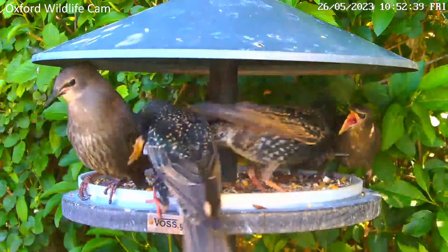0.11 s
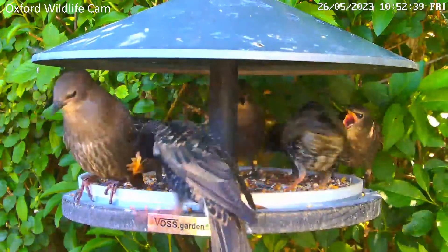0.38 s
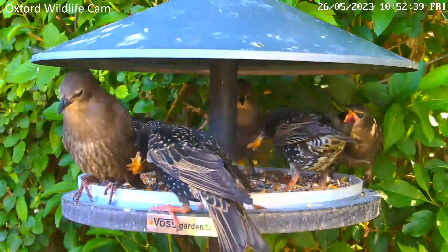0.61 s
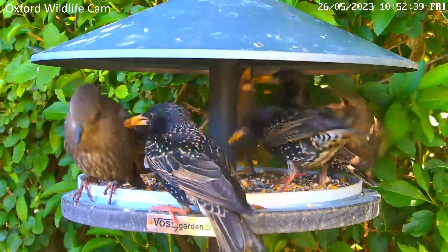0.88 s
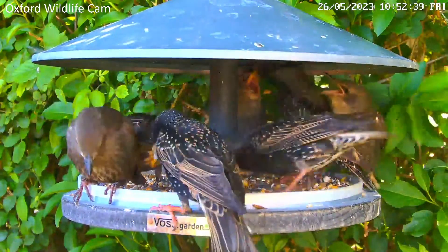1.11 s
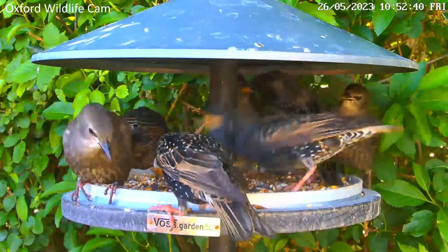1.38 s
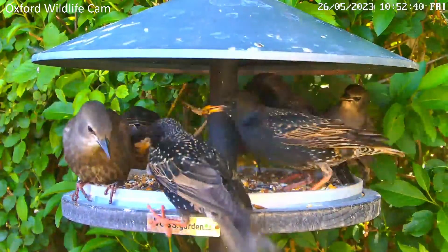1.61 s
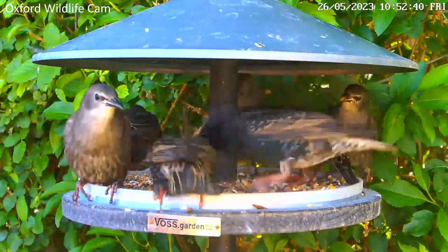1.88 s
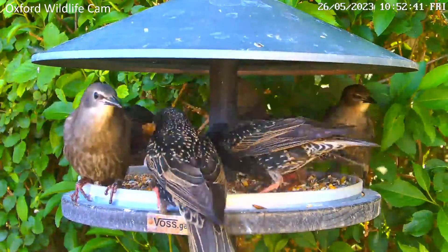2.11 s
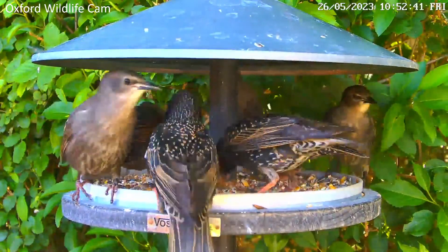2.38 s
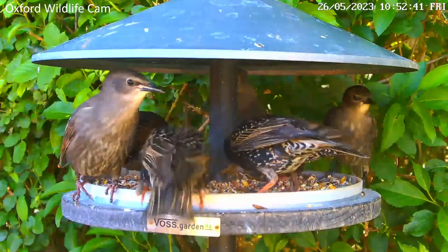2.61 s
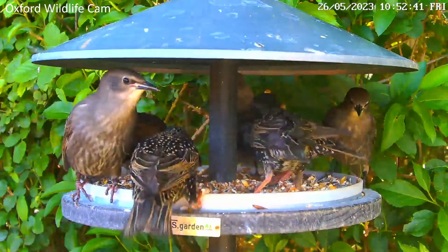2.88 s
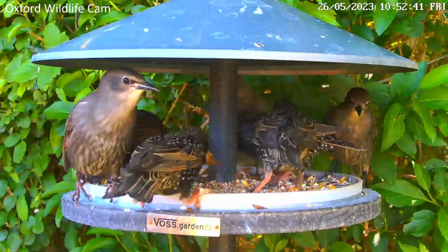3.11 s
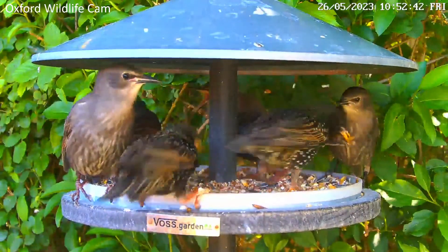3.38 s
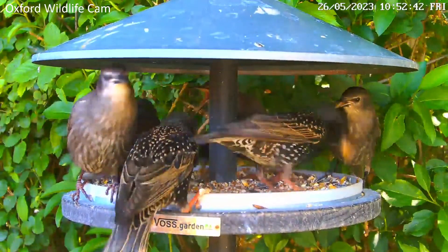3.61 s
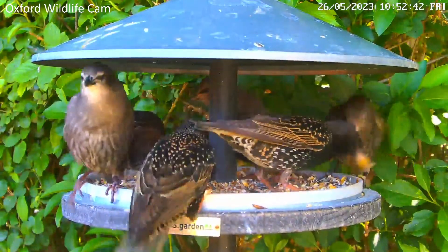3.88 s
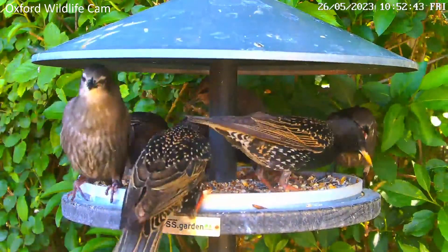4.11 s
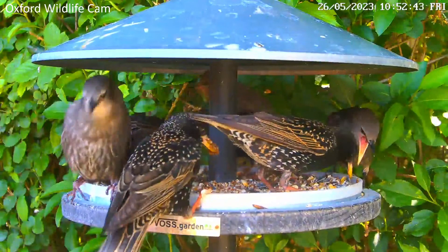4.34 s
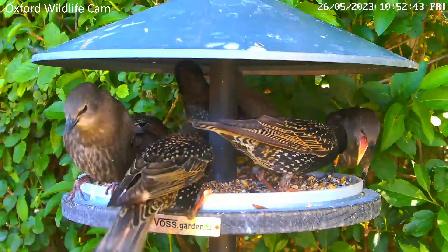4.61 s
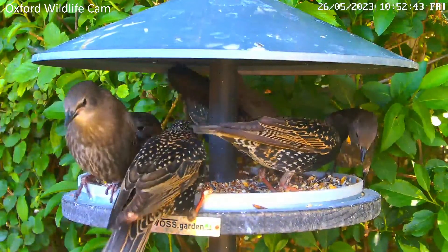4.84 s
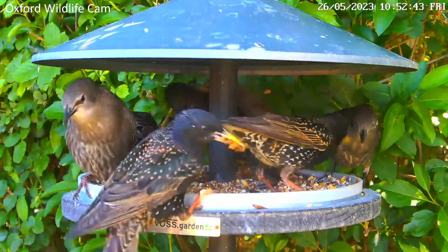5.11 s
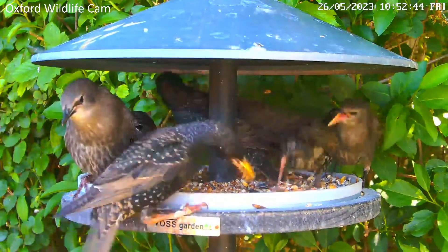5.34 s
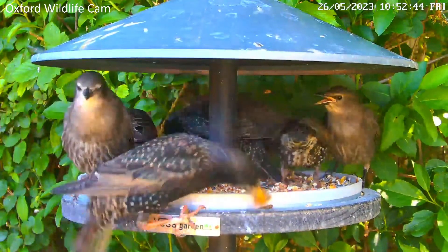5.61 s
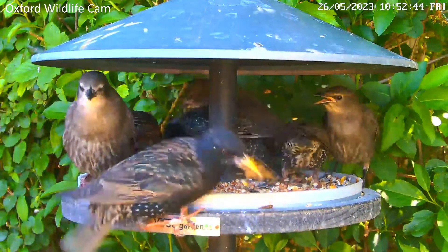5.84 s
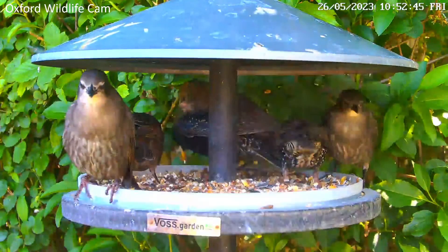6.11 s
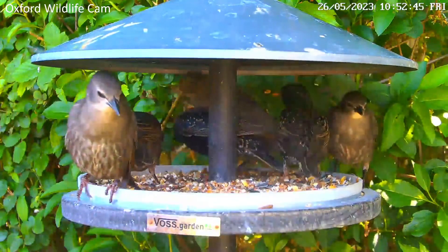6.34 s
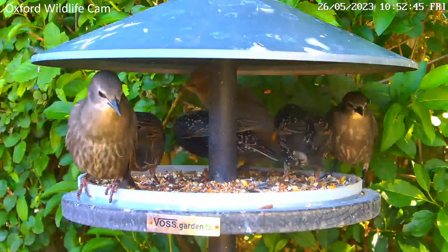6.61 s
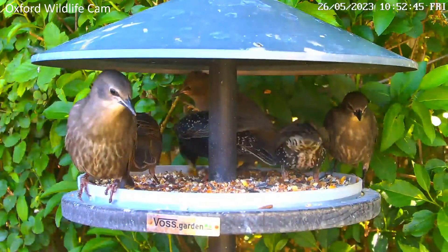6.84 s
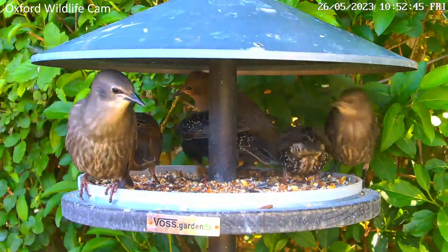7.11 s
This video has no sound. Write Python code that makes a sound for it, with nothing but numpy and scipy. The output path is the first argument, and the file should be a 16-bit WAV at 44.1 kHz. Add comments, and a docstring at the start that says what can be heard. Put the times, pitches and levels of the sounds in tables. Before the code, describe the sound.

Young starlings beg at a garden feeder, close to a small camera microphone. A raspy call opens, then from 0.2 to 0.65 s wing beats hit the microphone as deep, soft thumps with tray knocks, a sharp beak click at 0.53 and a buzzy warbling trill at 0.5. A loud harsh screech comes at 1.1, two strong hissing ones at 1.8-2.1, with thin sliding peeps around them. From 2.6 to 3.6 medium rasps mix with light taps. At 4.0 a bright call leads to the loudest trill, 4.3-4.5, with a hard knock at 4.4, then another rasp. Calls thin out around 5, return from 5.25 and peak sharply at 5.75. After a lull, a short trill and knock at 6.35 precede a strong screech at 6.6. Falling peeps, low flutters and growing faint hum close from 6.9 to 7.1. Treble dulls briefly at 4.05 and 6.3.

```python
"""Young starlings crowd a garden feeder and beg: rough voices and breath through moving throat and beak bands.
Three warbling trills and thin sliding peeps are tones with swung or shaken pitch.
Wing beats buffet the small camera microphone: low noise and pull-push pulses.
Knocks ring the tray, beak clicks are noise ticks, and a metal roof adds short echoes.
Mains harmonics swell and fade over garden noise; the treble drops out twice, briefly."""
import sys
import numpy as np
from scipy import signal
from scipy.fft import rfft, irfft, next_fast_len
from scipy.io import wavfile
from scipy.ndimage import uniform_filter1d

SR = 44100
rng = np.random.default_rng(int(sys.argv[2]) if len(sys.argv) > 2 else 0)


def convert_level_to_amplitude(level_db):
    """Map a level in decibels to its linear amplitude factor."""
    exponent = np.asarray(level_db, float) / 20
    return 10 ** exponent


def digitize_waveform(pressure):
    """Quantize a signal to 16-bit integers and store it at the path in sys.argv[1].

    Rows of a 2-D input are taken as channels; values are limited to [-1, 1].
    """
    field = np.atleast_2d(pressure).T
    bounded = np.clip(field, -1, 1)
    quanta = np.round(bounded * 32767).astype(np.int16)
    wavfile.write(sys.argv[1], SR, quanta)


N = 318402

# begging calls: start_s, crest_after_s, length_s, beak_db, beak_open_hz, throat_db, throat_hz, hiss_db
BEG_CALLS = [(-.08, 0.18, 0.31, -20.5, 4170, -38, 3042, -36.5),
             (0.206, 0.067, 0.26, -36, 3650, -32, 3170, -46.5),
             (0.481, 0.057, .13, -24, 4000, -33, 2736, -34.5), (.63, .16, .26, -36, 4310, -45, 2504, -45.5),
             (.87, .12, .24, -36.5, 4233, -40.5, 2879, -44),
             (1.08, .115, .285, -13, 4920, -19.5, 2814, -21),
             (1.398, 0.086, 0.17, -37, 4312, -65, 3256, -65), (1.6, .22, .26, -23, 4120, -50, 2532, -32),
             (1.822, .095, .2, -11, 4850, -27, 2396, -17.5), (1.95, .105, .19, -12.5, 4050, -29, 2400, -22),
             (2.1, .06, 0.25, -26.5, 3925, -26.5, 2938, -31.5),
             (2.608, .05, .1, -33.5, 4597, -48, 2690, -35), (2.671, .11, 0.23, -23, 4190, -22, 3033, -34),
             (2.85, .1, .34, -23.5, 4065, -29.5, 3000, -31), (3.18, .06, .13, -44, 3860, -35, 2828, -54),
             (3.276, 0.064, 0.12, -30, 4095, -34, 3042, -40.5),
             (3.385, .09, 0.16, -22.5, 4100, -29.5, 3020, -32),
             (3.52, .06, 0.16, -39.5, 3796, -33.5, 2898, -47),
             (4.043, 0.054, 0.25, -19.5, 5095, -38.5, 2450, -29.5),
             (4.266, 0.15, 0.25, -21.5, 4900, -30.5, 2600, -20),
             (4.575, .08, .21, -17, 4040, -25, 2969, -26), (4.77, .12, .275, -41, 3600, -31, 2637, -57),
             (5.251, 0.054, .125, -24, 3890, -32, 3165, -32.5),
             (5.318, 0.088, 0.16, -22.5, 5050, -28, 3016, -37.5),
             (5.46, .18, 0.31, -20.5, 4083, -27.5, 2847, -31),
             (5.728, 0.059, .11, -14.5, 4800, -31, 2714, -31), (5.8, .05, .13, -46, 4500, -36, 2700, -55),
             (5.898, 0.069, 0.26, -39, 4225, -46, 2831, -47), (6.14, .11, .16, -38, 4300, -64, 3207, -51.5),
             (6.309, 0.071, 0.13, -21.5, 4030, -35, 2756, -15.5),
             (6.41, 0.062, .17, -25, 4250, -28, 3010, -37),
             (6.56, 0.068, .17, -11.5, 4648, -23, 2879, -18.5), (6.69, .07, .26, -29, 4000, -25, 3150, -34),
             (6.9, 0.091, 0.3, -34, 4640, -40, 2940, -41),
             (7.12, 0.074, 0.12, -20.5, 3870, -28.5, 2915, -35.5)]
# upper rasp spectrum: freq_hz, level_db
HISS_SPECTRUM = [(4300, -35), (5200, 7.5), (5700, 0.5), (6500, 2), (7500, -1), (8200, -14), (8900, -28.5)]
# dull air under a call, spectrum: freq_hz, level_db
SKIRT_SPECTRUM = [(300, -25.5), (700, -11.5), (1100, -1), (1500, 16.5), (2000, -7.5), (3000, -49.5)]
# trills: start_s, end_s, first_tall_crest_s, warble_hz, pitch_hz,
# swing_once_hz, swing_twice_hz, swing_thrice_hz (per warble), first_swing_lag_turns, fade_s
TRILL_CALLS = [(.497, .63, .5200, 40.9, 2340, 330, 600, 0, .21, .04),
               (4.284, 4.545, 4.2906, 47.3, 2330, 400, 370, 150, .06, .09),
               (6.319, 6.438, 6.3412, 40.3, 2340, 340, 620, 0, .21, .01)]
# per trill: tone_db, overtones_re_tone_db
TRILL_LEVELS = [(-17, -4.5), (-6.5, -16.5), (-7.5, -2.5)]
# vocal tract of a trilling bird: freq_hz, gain_db
TRILL_TRACT_GAIN = [(1200, -21), (1800, -9), (2400, -3), (3100, -1.5), (3500, -5), (4000, -1), (4600, -9.5),
                    (6000, -9.5), (8500, -30)]
# thin cries from single birds: start_s, end_s, from_hz, to_hz, level_db
PEEP_CALLS = [(0.117, 0.336, 4284, 3400, -33), (0.721, 0.878, 4374, 4210, -41),
              (0.746, 0.968, 2027, 1997, -43.5), (.96, 1.09, 5300, 6000, -46),
              (1.184, 1.391, 4490, 3650, -25), (1.465, 1.493, 3300, 4300, -34),
              (1.626, 2.061, 4156, 3950, -29.5), (1.849, 2.134, 2170, 1706, -31.5),
              (3.406, 3.62, 4300, 3300, -33), (3.6, 3.76, 2900, 2300, -43),
              (4.052, 4.275, 4200, 4000, -32.5), (4.279, 4.286, 3100, 3000, -15.5),
              (4.668, 4.794, 3740, 2930, -27), (4.866, 4.898, 3620, 4260, -36.5),
              (4.936, 5.08, 2750, 2334, -29), (5.27, 5.304, 5640, 5520, -36),
              (5.444, 5.561, 6880, 6840, -37), (5.447, 5.697, 4330, 3850, -28),
              (5.62, 5.76, 3400, 2600, -33), (5.93, 6.14, 6970, 6930, -51), (5.934, 6.158, 4350, 4050, -42),
              (6.644, 6.771, 4400, 3047, -22.5), (6.837, 7.147, 4970, 4150, -34.5)]
# wing beats that hit the microphone: start_s, level_db, beat_hz
WING_BEATS = [(0.217, -26.5, 72.5), (0.259, -23, 75), (0.313, -16, 70), (0.387, -10.5, 60.4),
              (0.453, -6.5, 49.6), (0.521, -15.5, 45.4), (0.572, -12, 27), (0.64, -21, 40),
              (0.789, -29, 43.6), (6.942, -27, 40), (7.024, -18, 42), (7.111, -17.5, 42)]
# gusts on the microphone: crest_s, level_db, half_width_s
AIR_GUSTS = [(.47, -24.5, .14), (.8, -40, .03), (2.2, -41, .17), (2.75, -52, 0.28), (7.07, -32, .1)]
# buffeting spectrum: freq_hz, level_db
BUFFET_SPECTRUM = [(8, -38), (14, -5), (25, -1), (45, -8), (75, -8), (120, -22), (200, -32), (300, -38),
                   (700, -41), (1000, -60)]
# knocks on the tray: start_s, peak_db
TRAY_KNOCKS = [(0.189, -30), (0.203, -35.5), (0.335, -26), (0.414, -27), (0.46, -31.5), (0.495, -19),
               (0.514, -18.5), (0.533, -16.5), (2.655, -33.5), (3.207, -29), (3.286, -31), (3.344, -31),
               (3.974, -47.5), (4.27, -28.5), (4.394, -15), (4.418, -29.5), (5.927, -35), (6.241, -35),
               (6.355, -19)]
# tray modes: freq_hz, level_db, t60_s
TRAY_MODES = [(330, -1, 0.024), (513, 0, .02), (680, -1, .02), (936, 0, .03), (1100, -1, .025),
              (1360, -1, 0.042), (2600, -13, .01)]
# beak clicks: start_s, level_db
BEAK_CLICKS = [(0.5344, -5), (2.5408, -44), (2.6564, -26.5), (3.412, -24.5), (3.792, -36), (3.8188, -42.5),
               (3.977, -43.5), (5.163, -33.5), (5.24, -38.5)]
# mains hum course: time_s, level_db
HUM_COURSE = [(0.9, -63), (1.3, -48), (1.41, -55), (2.99, -47), (3.05, -53), (3.56, -47), (5.12, -43.5),
              (5.3, -56), (5.51, -51), (6.06, -51), (6.27, -41), (6.62, -41), (7.11, -34), (7.22, -40)]
# mains harmonics: freq_hz, level_db
HUM_HARMONICS = [(100, -16), (150, 0.5), (200, -17), (250, -20), (300, -18.5), (450, -23.5)]
# garden noise spectrum: freq_hz, level_db
GARDEN_SPECTRUM = [(30, -11.5), (60, -5), (130, -5.5), (220, -9), (350, -15.5), (900, -15), (1500, -17.5),
                   (2500, -19.5), (4000, -21), (6000, -27.5), (8000, -40.5), (9000, -62)]
# camera housing: freq_hz, gain_db
HOUSING_GAIN = [(5, -5), (1600, -2.5), (2000, -1), (2400, -1), (3050, 0.5), (3500, 0.5), (4050, 2),
                (4500, -0.5), (20000, -3)]
# treble dropouts: from_s, to_s
TREBLE_LOSSES = [(4.022, 4.076), (6.259, 6.38)]

# call band timing: late_s, fade_from_crest_to_end_db, shut_s; the throat follows and outlasts the beak
BEAK, THROAT, AIR = (0, -10, .05), (.015, -4.5, .07), (.0069, -13, .063)
ONSET_S, SOFT_S_PER_DB, LOUD_DB = .04, .002, -20  # calls below LOUD_DB set in more slowly
CLOSED_DB, SWELL_DB_PER_S = -23.5, 55  # depth of onset and shutting; climb from onset to crest
BEAK_REST_HZ, BEAK_CLOSING_S = 3700, .14  # the beak band slides back after the crest
THROAT_SAG = .1  # share of throat_hz lost from crest to end
FAR_BEAK_DB, FAR_BEAK_HZ = -61.5, 4400  # birds further off, always there
FAR_THROAT_DB, FAR_THROAT_HZ, FAR_HISS_DB = -58, 2600, -59
THROAT_WIDTH_HZ, BEAK_WIDTH_HZ = 1676, 1630
SQUEAL_WOBBLE_HZ, CROAK_WOBBLE_HZ = 150, 170
SKIRT_DB = -28.5  # re throat
CREST_DB = 2.5  # a trill is louder on its tall crest
PEEP_WOBBLE = .026  # share of the starting pitch
CALM_DB = -50  # moving air between gusts
SNAP, PULL_TURNS, PUSH_TURNS = 55, .24, .36  # harder beats flip faster; widths of the two halves
ROOF_DB, ROOF_T60_S = -12, .06
GARDEN_DB = -52.5
LIMIT = .69  # the microphone amplifier saturates here
DULL_HZ, EDGE_HZ = 4550, 8680  # low-pass cutoffs: in a treble dropout, otherwise


def evened(x):
    """Scale to rms 1."""
    return x / np.sqrt(np.mean(x ** 2) + 1e-20)


def played(rows):
    """Columns of a timed curve, interpolated at every sample."""
    time_s, *columns = np.transpose(rows)
    return [np.interp(np.arange(N) / SR, time_s, column) for column in columns]


def coloured(x, points):
    """Filter by a spectrum of (Hz, dB), interpolated over log frequency."""
    size = next_fast_len(len(x))
    hz, db = np.transpose(points)
    bins = np.log(np.fft.rfftfreq(size, 1 / SR) + 1)
    gain_db = np.interp(bins, np.log(hz + 1), db, left=-90, right=-90)
    return irfft(rfft(x, size) * convert_level_to_amplitude(gain_db), size)[:len(x)]


def drift(hz):
    """Random motion of rms 1: white noise low-passed at hz."""
    lowpass = signal.butter(2, hz, fs=SR, output="sos")
    return evened(signal.sosfilt(lowpass, rng.standard_normal(N)))


def add(mix, start_s, sound):
    """Mix a sound in place from start_s, cut at the end."""
    part = mix[round(start_s * SR):][:len(sound)]
    part += sound[:len(part)]


def begging():
    """Two uneven voices and their breath drive moving throat and beak resonances."""
    effort_db, throat_hz, beak_hz, throat_db, hiss_db = efforts()
    rough = np.clip(.33 - (effort_db + 14) / 30, .3, .75)  # louder calls keep a clearer warble
    pitch_hz = .5 * throat_hz + .24 * beak_hz
    voices = evened(syrinx(pitch_hz, rough, 41.5) + rough * syrinx(.9 * pitch_hz, rough, 47))
    breath = evened(rng.standard_normal(N) * convert_level_to_amplitude(drift(87)))  # the air comes in puffs
    drive = np.sqrt(1 - rough) * voices + 1.34 * rough * breath

    throat = resonate(drive, throat_hz, THROAT_WIDTH_HZ)
    throat = evened(coloured(throat, [(900, -14.5), (1500, 1.5), (1900, 5), (9000, -5.5)]))
    tight = np.clip(.2 + throat_db / 25, .1, .6)  # strong throat re beak: more narrow-band croak
    croak = hoarse(throat_hz, CROAK_WOBBLE_HZ)
    throat = np.sqrt(1 - tight) * throat + np.sqrt(tight) * croak
    throat += convert_level_to_amplitude(SKIRT_DB) * evened(coloured(breath, SKIRT_SPECTRUM))

    thin = np.clip(-throat_db / 30, .2, .65)  # weak throat: the beak squeals in a narrow band
    squeal = hoarse(beak_hz, SQUEAL_WOBBLE_HZ)
    beak = evened(resonate(drive, beak_hz, BEAK_WIDTH_HZ))
    beak = np.sqrt(1 - thin) * beak + np.sqrt(thin) * squeal

    hiss = evened(coloured(drive + 1.1 * breath, HISS_SPECTRUM))
    return convert_level_to_amplitude(effort_db) * (beak - convert_level_to_amplitude(throat_db) * throat) + convert_level_to_amplitude(hiss_db) * hiss


def efforts():
    """Flock levels and resonances: band powers add, resonances average by power."""
    t = np.arange(0, N / SR + .01, .002)
    beak, throat, hiss = convert_level_to_amplitude(2 * FAR_BEAK_DB), convert_level_to_amplitude(2 * FAR_THROAT_DB), convert_level_to_amplitude(2 * FAR_HISS_DB)
    beak_hz, throat_hz = FAR_BEAK_HZ * beak, FAR_THROAT_HZ * throat  # power-weighted sums
    for start, crest, length, beak_db, open_hz, throat_db, hz, hiss_db in BEG_CALLS:
        upper = power(t, start, crest, length, beak_db, *BEAK)
        lower = power(t, start, crest, length, throat_db, *THROAT)
        beak, throat = beak + upper, throat + lower
        hiss = hiss + power(t, start, crest, length, hiss_db, *AIR)
        after = np.maximum(t - start - crest, 0)
        slide_hz = (open_hz - BEAK_REST_HZ) * np.exp(-after / BEAK_CLOSING_S)
        beak_hz = beak_hz + upper * (BEAK_REST_HZ + slide_hz)
        sag = THROAT_SAG * np.minimum(after / (length - crest), 2)
        throat_hz = throat_hz + lower * hz * (1 - sag)
    beak_db, hiss_db = 10 * np.log10(beak), 10 * np.log10(hiss)
    throat_re_beak_db = 10 * np.log10(throat / beak)
    curves = [t, beak_db, throat_hz / throat, beak_hz / beak, throat_re_beak_db, hiss_db]
    return played(np.transpose(curves))


def power(t, start, crest, length, db, late, fade_db, shut):
    """Power of one call band: snaps on, swells, fades and shuts."""
    on = min(ONSET_S + SOFT_S_PER_DB * max(LOUD_DB - db, 0), .9 * crest)
    low_db = -SWELL_DB_PER_S * (crest - on)
    at = start + late + np.array([0, on - late * 0, crest, length, length + shut])
    course_db = [low_db + CLOSED_DB, low_db, 0, fade_db, fade_db + CLOSED_DB]
    return convert_level_to_amplitude(2 * (db + np.interp(t, at, course_db, -99, -99)))


def syrinx(centre_hz, rough, warble_hz):
    """A tone with two overtones, its pitch thrown up and down unevenly, twice per warble."""
    turn = 2 * np.pi * np.cumsum(warble_hz * (1 + .064 * drift(15))) / SR
    throw = .218 * np.cos(2 * turn) + .12 * np.cos(turn - 1.2) + .14 * rough * drift(299.1)
    cycle = 2 * np.pi * np.cumsum(centre_hz * (1 + throw)) / SR
    tone = np.cos(cycle) + np.cos(2 * cycle) + convert_level_to_amplitude(2) * np.cos(3 * cycle)
    return tone * convert_level_to_amplitude(3.75 * rough * drift(320))


def resonate(x, hz, width_hz):
    """A moving resonance: shift to 0 Hz, low-pass twice for steep flanks, shift back."""
    turn = np.exp(2j * np.pi * np.cumsum(hz) / SR)
    r = np.exp(-np.pi * width_hz / SR)
    low = signal.lfilter([1 - r], [1, -r], x / turn)
    low = signal.lfilter([1 - r], [1, -r], low)
    return 2 * (turn * low).real


def hoarse(hz, wobble_hz):
    """A tone whose pitch and strength shake at random."""
    shake = convert_level_to_amplitude(3.5 * drift(200)[:len(hz)])
    pitch_hz = hz + wobble_hz * drift(90)[:len(hz)]
    return evened(shake * np.sin(2 * np.pi * np.cumsum(pitch_hz) / SR))


def trill(start, end, crest, rate, hz, slow_hz, fast_hz, spike_hz, lag, fade, db, overtones_db):
    """A warbling tone: pitch swings at 1, 2 and 3 times the rate; the tract filter shades the sweep."""
    t = np.arange(start, end, 1 / SR)
    turn = 2 * np.pi * rate * (t - crest) + .12 * drift(25)[:len(t)]
    pitch_hz = hz + fast_hz * np.cos(2 * turn) + slow_hz * np.cos(turn - 2 * np.pi * lag)
    pitch_hz += 40 * drift(300)[:len(t)]
    pitch_hz += spike_hz * np.cos(3 * turn)  # sharpens the tall crest
    cycle = 2 * np.pi * np.cumsum(pitch_hz) / SR
    tone = np.cos(cycle) + convert_level_to_amplitude(overtones_db) * (np.cos(2 * cycle) + 1.6 * np.cos(3 * cycle))
    swell = np.minimum(1, .17 + (t - start) / .022) * np.minimum(1, (end - t) / fade)
    swell *= convert_level_to_amplitude(CREST_DB * np.cos(turn) + 1.5 * drift(150)[:len(t)])
    return start, convert_level_to_amplitude(db) * np.sqrt(2) * coloured(tone * swell, TRILL_TRACT_GAIN)


def peep(start, end, from_hz, to_hz, db):
    """A short hoarse whistle whose pitch slides linearly."""
    count = round((end - start) * SR)
    whistle = hoarse(np.linspace(from_hz, to_hz, count), PEEP_WOBBLE * from_hz)
    return start, convert_level_to_amplitude(db) * whistle * signal.windows.tukey(count, .5)


def wings():
    """Lumpy low rumble of moving air; each near wing beat pulls the air, then flips to a push."""
    t = np.arange(N) / SR
    air = convert_level_to_amplitude(CALM_DB)
    for crest_s, db, width_s in AIR_GUSTS:
        air = air + convert_level_to_amplitude(db) * np.exp(-((t - crest_s) / width_s) ** 2 / 2)
    lumps = convert_level_to_amplitude(2.5 * drift(7))
    out = air * lumps * evened(coloured(rng.standard_normal(N), BUFFET_SPECTRUM))
    for start_s, db, hz in WING_BEATS:
        turns = np.arange(0, 1.5, hz / SR) - .45
        width = np.where(turns < 0, PULL_TURNS, PUSH_TURNS)
        flip = np.tanh((4 + SNAP * convert_level_to_amplitude(2 * db)) * turns) * np.exp(-(turns / width) ** 2)
        add(out, start_s, 1.3 * convert_level_to_amplitude(db) * flip)
    return out


def taps():
    """Knocks ring detuned decaying tray modes; beak clicks are short bright noise ticks."""
    out, t = np.zeros(N), np.arange(2000) / SR
    for start_s, db in TRAY_KNOCKS:
        ring = np.zeros(len(t))
        for hz, level_db, t60_s in TRAY_MODES:
            mode_hz = hz * (1 + .091 * rng.uniform(-1.1, 1))
            ring += convert_level_to_amplitude(level_db - 60 * t / t60_s) * np.sin(2 * np.pi * mode_hz * t)
        add(out, start_s, convert_level_to_amplitude(db) * ring / abs(ring).max())
    bright = [(700, -14), (2500, -8.5), (6000, 7.5), (8000, -8.5), (9500, -23.5)]  # Hz, dB
    for start_s, db in BEAK_CLICKS:
        grit = rng.standard_normal(len(t)) * convert_level_to_amplitude(-60 * t / .0054)
        tick = coloured(grit, bright)
        add(out, start_s, 2.1 * convert_level_to_amplitude(db) * tick[:1000] / abs(tick).max())
    return out


def roof(x):
    """Short echoes between tray and metal roof: sparse random decaying taps."""
    t = np.arange(4000) / SR
    sparse = rng.standard_normal(len(t)) * (rng.random(len(t)) < .05)
    tail = sparse * convert_level_to_amplitude(-60 * t / ROOF_T60_S) * (t > .0015)
    return x + convert_level_to_amplitude(ROOF_DB) * signal.oaconvolve(x, tail / np.linalg.norm(tail))[:N]


def hum():
    """Mains harmonics that waver a little in pitch and level."""
    cycle = 2 * np.pi * np.cumsum(1 + .003 * drift(1.87)) / SR
    lines = np.zeros(N)
    for hz, db in HUM_HARMONICS:
        lines += convert_level_to_amplitude(db + .6 * drift(3)) * np.sin(hz * cycle + 2 * np.pi * rng.random())
    return np.sqrt(2) * convert_level_to_amplitude(played(HUM_COURSE)[0]) * lines


def garden():
    """Coloured background noise whose level drifts slowly."""
    return convert_level_to_amplitude(GARDEN_DB + 1.8 * drift(6)) * evened(coloured(rng.standard_normal(N), GARDEN_SPECTRUM))


def scene():
    """Birds and taps under the roof through the housing, plus wings, hum and garden."""
    birds = begging() + taps()
    for call, levels in zip(TRILL_CALLS, TRILL_LEVELS):
        add(birds, *trill(*call, *levels))
    for call in PEEP_CALLS:
        add(birds, *peep(*call))
    return (coloured(roof(birds), HOUSING_GAIN) + wings() + hum() + garden())[None]


def low_pass(x):
    """Removes everything above the highest recorded frequency."""
    return signal.sosfilt(signal.butter(12, 9050, fs=SR, output="sos"), x)


def record(dry):
    """Soft overload, a narrow camera band and two short losses of treble."""
    dry = LIMIT * np.tanh(dry / LIMIT)
    full_fir = signal.firwin(201, EDGE_HZ, window=("kaiser", 9), fs=SR)
    dull_fir = signal.firwin(401, DULL_HZ, window=("kaiser", 9), fs=SR)
    full = signal.oaconvolve(dry, full_fir[None], "same")
    dull = signal.oaconvolve(dry, dull_fir[None], "same")
    t = np.arange(N) / SR
    lost = sum(1. * ((t > from_s) & (t < to_s)) for from_s, to_s in TREBLE_LOSSES)
    lost = uniform_filter1d(lost, size=150)
    return low_pass(full + lost * (dull - full))


dry = scene()
out = record(dry)
digitize_waveform(out)
```